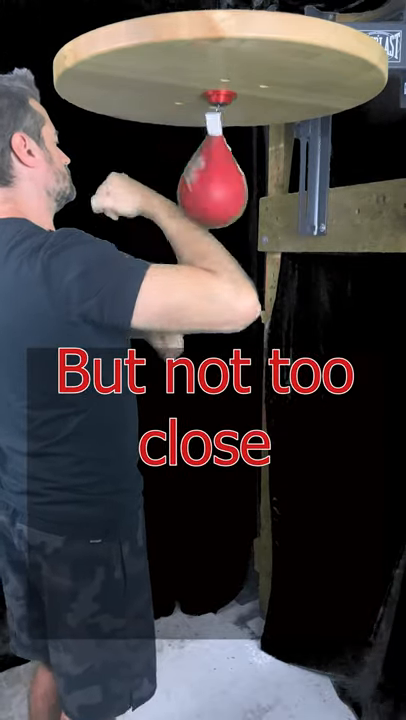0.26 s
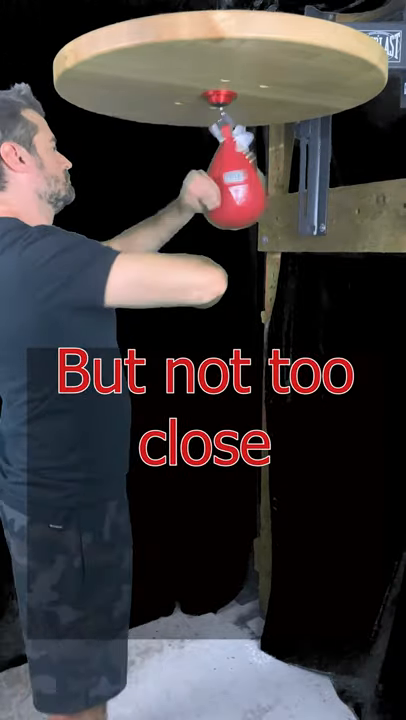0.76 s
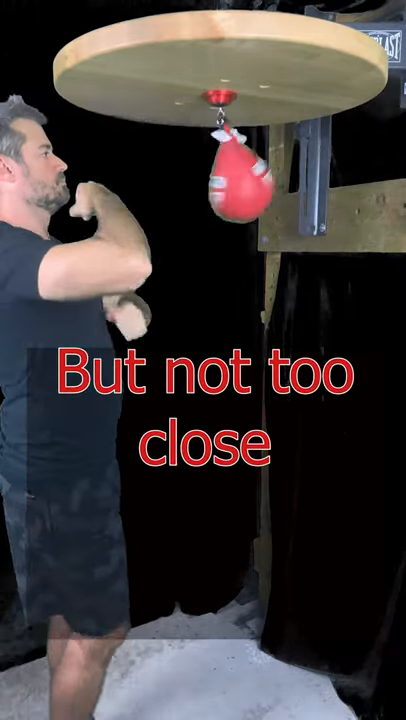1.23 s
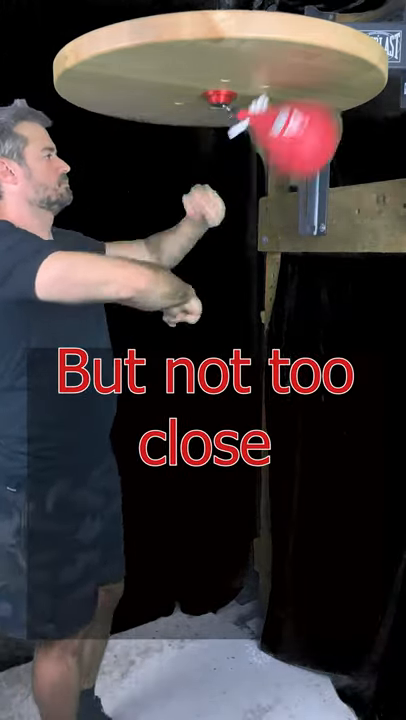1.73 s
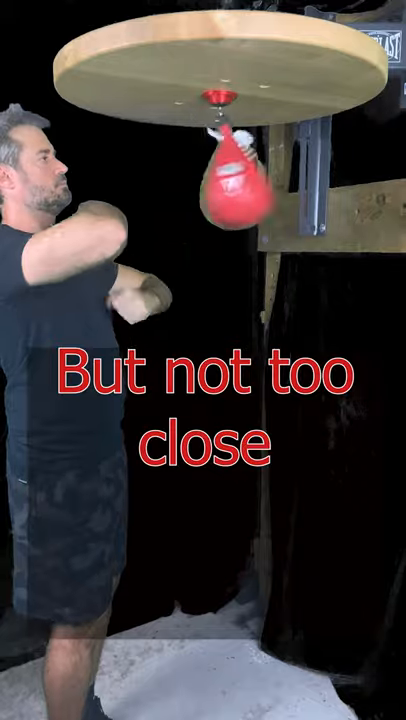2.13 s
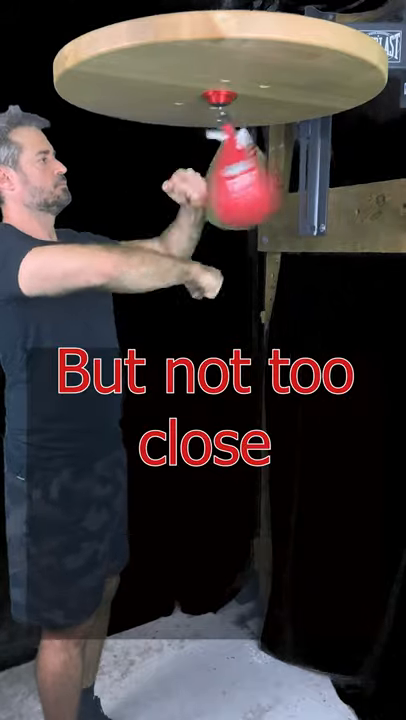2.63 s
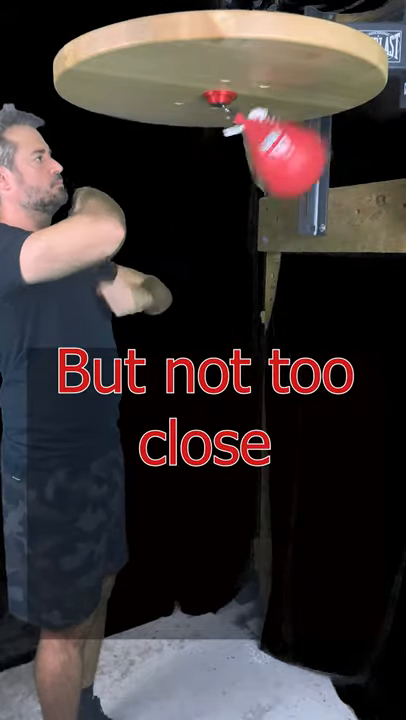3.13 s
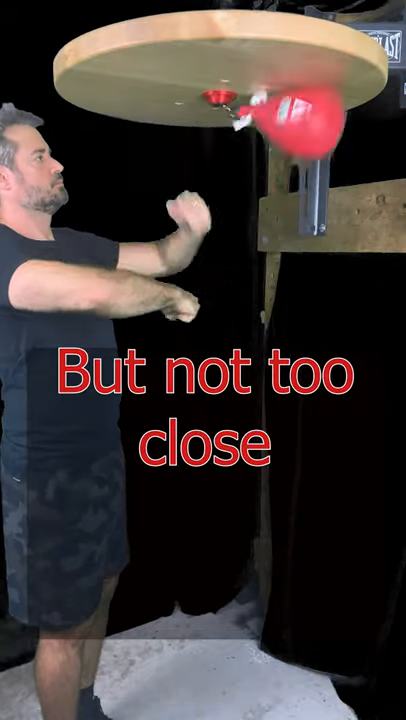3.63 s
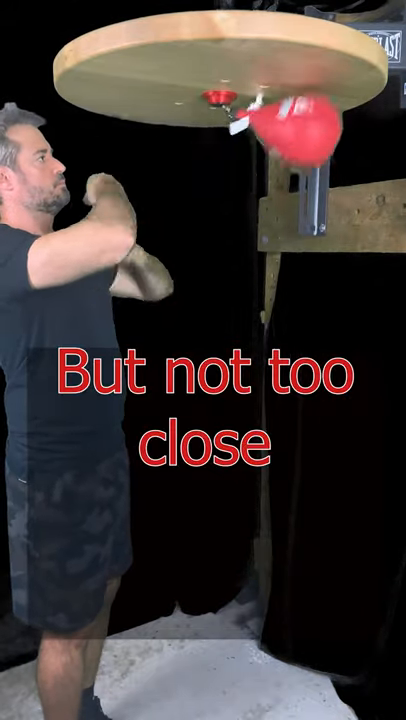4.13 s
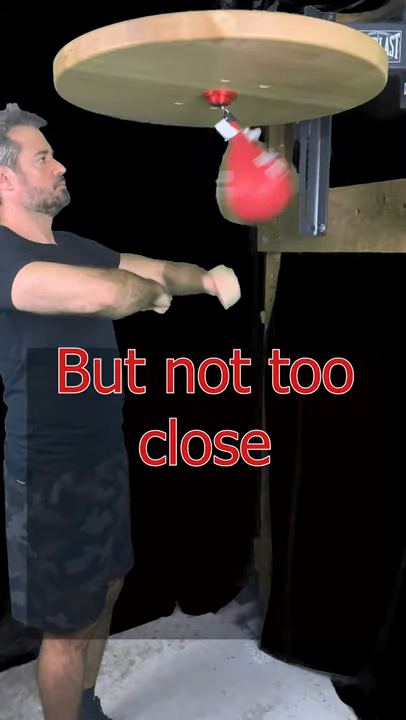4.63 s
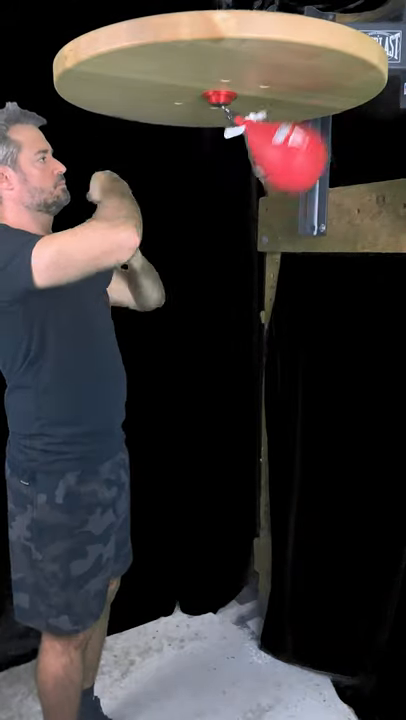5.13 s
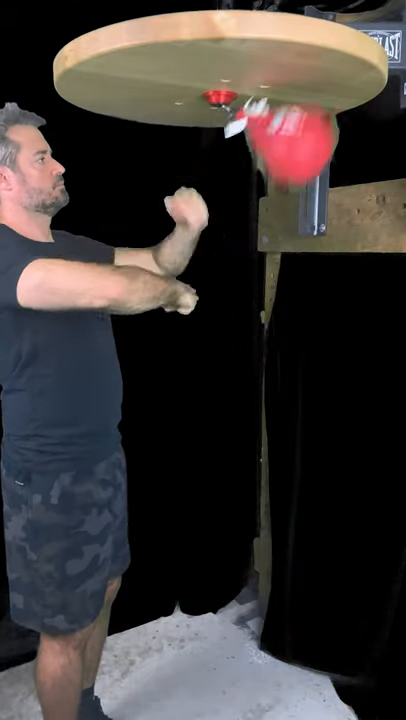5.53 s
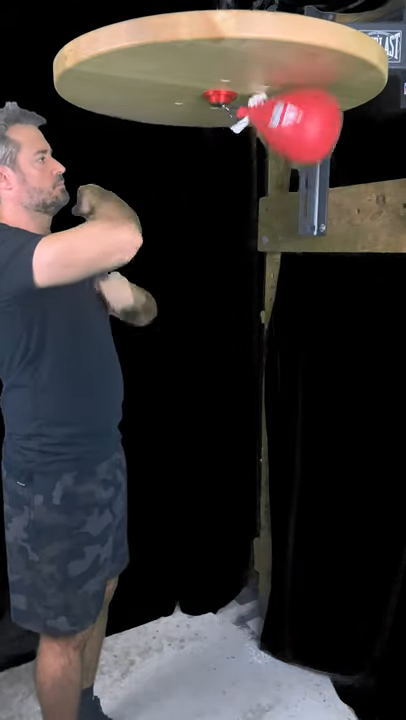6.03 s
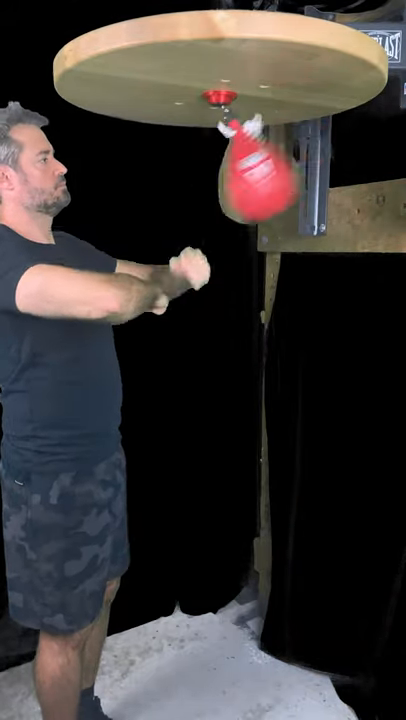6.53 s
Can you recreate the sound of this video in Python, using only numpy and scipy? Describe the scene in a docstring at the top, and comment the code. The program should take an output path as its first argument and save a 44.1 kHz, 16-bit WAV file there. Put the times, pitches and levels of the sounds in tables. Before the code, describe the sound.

A leather speed bag is punched in a small hard room, rattling off a wooden board in quick uneven slaps, knocks and low booms.

```python
"""A leather speed bag under a wooden board in a small hard room. It opens on a bag already swinging from a punch.
Then, over and over, two quick punches each throw it at the far edge; it swings free to the near edge and back.
Each contact slaps (spike, crackle), pops and knocks (decaying sines) and booms at the same moment through board,
wall and room (low decaying sines). A noise tail decays over the next second; a steady noise floor lies beneath.
It ends in mid-swing."""
import sys
import numpy as np
from scipy import signal
from scipy.fft import rfft, irfft, next_fast_len
from scipy.io import wavfile
from scipy.ndimage import uniform_filter1d

SR = 44100
rng = np.random.default_rng(int(sys.argv[2]) if len(sys.argv) > 2 else 0)


def master_out(mix):
    """Clip the mix to full scale and print it as 16-bit PCM to the path in sys.argv[1]."""
    frames = np.transpose(np.atleast_2d(mix))
    ceiling = np.clip(frames, -1, 1)
    pcm = np.round(ceiling * 32767).astype(np.int16)
    wavfile.write(sys.argv[1], SR, pcm)


N = 298998
LEAD_S = .15  # room for blows that fall before time zero
SLAP_LAG_S = .001  # the leather flattens briefly before it slaps


def undb(db):
    """Decibels to amplitude."""
    return 10 ** (np.asarray(db) / 20)


def band(x, lo_hz, hi_hz):
    """Keep one frequency band."""
    return signal.sosfilt(signal.butter(3, [lo_hz, min(hi_hz, .45 * SR)], "band", fs=SR, output="sos"), x)


def soften(x, order, hz, kind="low"):
    """Gently sloped low or high pass."""
    return signal.sosfilt(signal.butter(order, hz, kind, fs=SR, output="sos"), x)


def unit(x):
    """Scale to an RMS of one."""
    return x / np.sqrt(np.mean(x ** 2))


def add(out, sound, s):
    """Mix a sound in at time s; the buffer starts LEAD_S early."""
    i = int(round((s + LEAD_S) * SR))
    out[..., i:i + sound.shape[-1]] += sound[..., :out.shape[-1] - i]


def ring(hz, t60, gain, seconds):
    """Sum of decaying sines started by one push."""
    t = np.arange(int(seconds * SR)) / SR
    decay = np.exp(-np.log(1000) * np.outer(1 / t60, t))
    return gain @ (np.sin(2 * np.pi * np.outer(hz, t)) * decay)


def flicker(size, rate):
    """Random levels held 1 / rate seconds and slewed; spread near 1."""
    hold = int(SR / rate)
    steps = np.repeat(rng.standard_normal(size // hold + 1), hold)
    return 1.07 * uniform_filter1d(steps, hold)[:size]


# bag meets board: (time [s], snap [dB], knock [dB], weight [dB], pop [Hz]), levels relative
BOARD_HITS = [(-.038, -11.5, -20.5, -25.5, 1670), (0.1717, -18.5, -25, -33, 1550),
              (0.4482, -30.5, -30, -34, 1370), (0.6984, -13, -16, -23.5, 1500),
              (0.855, -11, -15, -24.5, 1390), (1.063, -25.5, -24, -34, 1590),
              (1.3471, -30.5, -30.5, -34, 1580), (1.5656, -15.5, -21.5, -25.5, 1570),
              (1.7679, -14, -19.5, -26, 1580), (1.991, -20, -25, -35.5, 1420),
              (2.2781, -32, -28, -35.5, 1640), (2.5363, -16, -20.5, -26.5, 1340),
              (2.7209, -13, -19.5, -23.5, 1830), (2.9306, -18, -24, -33, 1710),
              (3.2071, -24.5, -29, -34.5, 1500), (3.456, -14, -22, -27, 1390),
              (3.6538, -13, -17.5, -24, 1680), (3.8596, -18.5, -22.5, -31, 2140),
              (4.1342, -29, -31, -34.5, 1420), (4.3896, -18.5, -24, -29, 1500),
              (4.577, -15.5, -20, -25.5, 2100), (4.7984, -19.5, -24.5, -34, 1550),
              (5.0903, -30, -32.5, -35.5, 1420), (5.3645, -18, -23, -27, 1440),
              (5.5764, -14, -21, -25, 1390), (5.7879, -19.5, -22.5, -34, 1850),
              (6.0657, -26, -28.5, -36, 1570), (6.3027, -14, -20.5, -26, 1210),
              (6.4915, -14, -19, -22, 1690), (6.6817, -15.5, -20.5, -30, 2040)]
# fist meets bag: (time [s], snap [dB], knock [dB], weight [dB], pop [Hz]), levels relative
FIST_HITS = [(-0.15, -23, -15, -18.5, 1800), (0.614, -27, -32, -26.5, 1390), (0.7849, -27, -30, -23, 1600),
             (1.484, -32.5, -40.5, -29.5, 1610), (1.679, -33, -33, -25, 1190),
             (2.4464, -37, -35.5, -29, 1700), (2.6396, -29.5, -31.5, -25, 1610),
             (3.3655, -35.5, -36.5, -28.5, 1620), (3.57, -31, -31, -24.5, 1600),
             (4.2906, -31, -33, -28, 1820), (4.5008, -29.5, -30.5, -24.5, 1140),
             (5.264, -35.5, -36.5, -30, 1170), (5.4883, -26.5, -27, -26, 1280),
             (6.2201, -38, -37, -27.5, 1630), (6.4114, -25.5, -27.5, -23, 1930)]
# slap grows with snap, thud with weight, by striking place:
# (slap offset [dB], slap slope [dB per dB], thud offset [dB], thud slope [dB per dB])
LEVEL_LAWS = {"near": (9.5, 1.12, -7.5, 0.81), "fist": (7.5, 0.69, 2.3, 1.564), "far": (4, 0.8, -12.5, 0.9)}


def blows():
    """All contacts in order, with layer levels; a punch sends the bag to the far edge, a free swing changes edge."""
    rows = sorted([(*r, "fist") for r in FIST_HITS] + [(*r, "board") for r in BOARD_HITS])
    out, place = [], "fist"
    for s, snap_db, knock_db, weight_db, pop_hz, kind in rows:
        if kind == "fist":
            place = "fist"
        else:
            place = "near" if place == "far" else "far"
        slap_offset, slap_slope, thud_offset, thud_slope = LEVEL_LAWS[place]
        slap_db = slap_offset + slap_slope * snap_db
        thud_db = thud_offset + thud_slope * weight_db
        out.append((s, slap_db, knock_db, weight_db, pop_hz, thud_db, snap_db, place))
    return out


# early echoes off board, wall and arms: (delay [s], level against the spike [dB])
NEAR_ECHOES = [(.00035, -1.5), (.0022, -16), (.0032, -11), (.0065, -15.5), (.0095, -16), (0.011, -15)]


def slap(size, lo_hz=2000, hi_hz=13500, rattle_db=-26, rattle_s=0.003, touch_db=-22, touch_s=0.0007,
         spike_db=5, fist_spike_db=-12, tick_db=-2, knuckle_s=0.0084, knuckle_db=-5, gain_db=8):
    """Leather meeting flat: a rising touch, a steep spike with near echoes, a short crackle; a fist lands twice."""
    t, out = np.arange(900) / SR - SLAP_LAG_S, np.zeros(size)
    touch = undb(touch_db) * np.exp(np.minimum(t, 0) / touch_s)
    rattle = undb(rattle_db) * np.exp(-np.maximum(t, 0) / rattle_s)
    shape = np.where(t < 0, touch, rattle)
    delay, echo_db = np.transpose(NEAR_ECHOES)
    for s, slap_db, *_, place in blows():
        level_db = slap_db + gain_db
        crackle = shape * rng.standard_normal((2, len(t)))
        spike = undb(fist_spike_db if place == "fist" else spike_db)
        crackle[:, np.argmax(t >= 0)] = spike
        moved = delay * (1 + 0.14 * rng.standard_normal(len(delay)))  # the bag never lands twice on one spot
        echo = spike * undb(echo_db) * rng.uniform(-1.12, 1, len(delay))
        crackle[0, np.searchsorted(t, np.clip(moved, 0, .018))] += echo
        add(out, undb(level_db) * crackle[0], s)
        if place == "fist":
            # skin on leather: a thin bright tick, then a second landing
            add(out, undb(level_db + tick_db) * np.array([.5, -1, .5]), s + SLAP_LAG_S)
            add(out, undb(level_db + knuckle_db) * crackle[1], s + knuckle_s)
    return soften(soften(out, 2, lo_hz, "high"), 2, hi_hz)


# short rings of wood and leather: (frequency [Hz], decay t60 [s], relative level [dB])
WOOD_MODES = [(370, 0.18, -3.5), (656, 0.054, -11.5), (1250, 0.014, -26.5), (1620, 0.017, 0.5),
              (1944, 0.03, -3.5), (2418, 0.038, -8), (3100, 0.011, -6.5)]


def knock(size, scatter_db=-2.5, detune=0.044, gain_db=-6, pop_db=12, pop_t60=0.0068, focus_oct=0.84,
          wall_s=0.011, wall_db=-10.5):
    """The air in the bag pops at its own pitch; wood modes near that pitch ring on, in a new mix each time."""
    hz, t60, mode_db = np.transpose(WOOD_MODES)
    out = np.zeros((2, size))
    for s, _, knock_db, _, pop_hz, *_ in blows():
        level_db, start = knock_db + gain_db, s + SLAP_LAG_S
        pitch = hz * (1 + detune * rng.standard_normal(len(hz)))
        focus = np.exp(-.5 * (np.log2(hz / pop_hz) / focus_oct) ** 2) + 0.25
        mix = focus * undb(mode_db + scatter_db * rng.standard_normal((2, len(hz))))
        pop = ring(np.array([pop_hz]), np.array([pop_t60]), undb([pop_db]), .05)
        add(out, undb(level_db) * (ring(pitch, t60, mix, .05) + pop), start)
        add(out, undb(level_db + wall_db) * pop, start + wall_s)  # the wall returns the pop
    return out


# low modes of board, wall and room, with the signed share each striking place gives them:
# (frequency [Hz], decay t60 [s], near edge [gain], fist [gain], far edge [gain])
LOW_MODES = [(53.5, 0.35, -0.51, -0.76, -0.54), (60.6, 0.16, 0.9, 1.8, 0.88),
             (74, 0.93, -0.24, -0.083, 0.25), (80.34, 0.6, 0.49, -0.36, -0.97),
             (82.65, 0.31, -1.17, -0.92, 0.13), (95.65, 0.37, -0.52, -0.79, -0.74),
             (100, 0.16, 1, 2.02, 0.58), (116.4, 0.12, 0.45, -0.27, 0.95),
             (126.1, 0.27, -0.36, -0.4, -0.55), (139.8, 0.57, 0.059, 0.024, 0.26),
             (152, 0.054, -0.49, -0.088, -0.73), (168.6, 0.51, -0.095, -0.26, -0.21),
             (186.2, 0.6, 0.099, 0.062, -0.024), (203.9, 0.68, 0.078, 0.055, 0.17),
             (242, 0.13, 0.0083, -0.03, -0.23), (255, 0.15, 0.024, -0.024, 0.014),
             (320, 0.078, -0.018, -0.0083, -0.13)]
# onset of the boom against the blow, by striking place: (lag [s]), negative is early
LOW_LAG_S = {"near": -.0007, "fist": 0, "far": -.0005}
# boom level added to the weight, by striking place: (level [dB])
LOW_GAIN_DB = {"near": 9, "fist": 2.5, "far": 4}


def boom(size):
    """Every blow at one place rings the low modes of board, wall and room in the same proportions."""
    hz, t60, *share = np.transpose(LOW_MODES)
    shape = {place: ring(hz, t60, gain, 0.88) for place, gain in zip(("near", "fist", "far"), share)}
    out = np.zeros(size)
    for s, _, _, weight_db, *_, place in blows():
        level = undb(weight_db + LOW_GAIN_DB[place])
        add(out, level * shape[place], s + LOW_LAG_S[place])
    return out


# squashed bag: (frequency [Hz], decay t60 [s], relative level [dB])
BAG_MODES = [(320, 0.048, 2), (370, 0.022, -7), (557, 0.059, -4)]


def thud(size, gain_db=-3, detune=0.02):
    """The whole bag squashes and springs back: short low rings, slightly detuned each time."""
    hz, t60, mode_db = np.transpose(BAG_MODES)
    out = np.zeros(size)
    for s, *_, thud_db, _, _ in blows():
        pitch = hz * (1 + detune * rng.standard_normal(len(hz)))
        add(out, ring(pitch, t60, undb(thud_db + gain_db + mode_db), .05), s + SLAP_LAG_S)
    return out


def swivel(size, early_s=0.013, gain_db=-17, lo_hz=750, hi_hz=2600, grain_db=4):
    """The swivel rattles as the bag swings up to the board: lumpy noise just ahead of contact."""
    out, span = np.zeros((2, size)), int(early_s * SR)
    for s, _, knock_db, *_, place in blows():
        if place != "fist":
            lumps_db = grain_db * np.repeat(rng.standard_normal(span), 60)[:span]
            grains = rng.standard_normal((2, span)) * undb(lumps_db)
            add(out, undb(knock_db + gain_db) * grains, s - early_s)
    return band(out, lo_hz, hi_hz)


# reverberant bands: (centre [Hz], decay t60 [s], level against the blow [dB], likeness left-right [0-1])
ROOM_BANDS = [(236.5, 0.64, -15.5, 0.89), (384.7, 0.64, -16, 0.73), (619, 0.47, -18, 0.22),
              (1036, 0.46, -20, 0.17), (1500, 0.38, -17, 0.52), (2330, 0.4, -18.5, 0),
              (4010, 0.42, -20, 0.51), (4900, 0.4, -24.5, 1), (7200, 0.32, -20.5, 1),
              (10100, 0.29, -25.5, 0.3), (13100, 0.28, -27.5, .5)]
# narrow resonances of board, bracket and room that colour the tail:
# (centre [Hz], decay t60 [s], level against the blow [dB], likeness left-right [0-1])
ROOM_RINGS = [(149.2, 0.97, -15.5, 0.98), (312.5, 0.29, -26.5, 1), (493, 0.3, -30, 0.3),
              (658, 0.22, -20, 0.4), (816, 0.3, -26.5, 0.5), (1210, 0.28, -25, 0),
              (1390, 0.35, -27.5, 0.43), (1620, 0.54, -38.5, 0), (2115, 0.86, -35.5, 0),
              (2767, 0.087, -21, 0)]


def tail(size, rise_s=0.00067, fist_db=3, fist_air_db=1, thud_share=0.42, lumpy_db=2, lumps=60, colour_db=3,
         late_db=-23, late_stretch=3.17):
    """Dense reflections, band by band: low bands follow boom and thud, middle ones the knock, high ones the snap."""
    out, t = np.zeros((2, size)), np.arange(SR) / SR
    bands = [(row, 1.25) for row in ROOM_BANDS] + [(row, 1.05) for row in ROOM_RINGS]
    for (hz, t60, db, alike), span in bands:
        rate = 2 * np.log(1000) / t60  # for power
        late = undb(2 * late_db) * np.exp(-rate * t / late_stretch)  # weaker, slower: the adjoining space
        decay = (np.exp(-rate * t) + late) * (1 - np.exp(-t / rise_s))
        power = np.zeros(size)
        for s, _, knock_db, weight_db, pop_hz, thud_db, snap_db, place in blows():
            fist = place == "fist"
            low_db = thud_share * weight_db + (1 - thud_share) * thud_db + 5
            high_db = snap_db + fist_air_db * fist
            drive_db = np.interp(np.log(hz), np.log([400, 1000, 2500, 5000]),
                                 [low_db, knock_db, knock_db, high_db])
            # the room returns the pop's colour
            drive_db += colour_db * np.exp(-2 * np.log2(hz / pop_hz) ** 2)
            add(power, undb(2 * (drive_db + db + fist_db * fist)) * decay, s + SLAP_LAG_S)
        mid, side = (unit(band(rng.standard_normal(size), hz / span, hz * span)) for _ in range(2))
        power = power * undb(2 * lumpy_db * flicker(size, lumps))  # reflections arrive in clumps
        alike = np.clip(alike, 0, 1)
        common = np.sqrt(1 + alike) * mid
        opposed = np.sqrt(1 - alike) * side * np.array([[1], [-1]])
        out += np.sqrt(power / 2) * (common + opposed)
    return out


# steady noise bed: (centre [Hz], relative level in the band [dB])
NOISE_BANDS = [(60, -58.5), (150, -57), (500, -64.5), (1500, -76), (10000, -105)]


def floor(size):
    """Quiet steady room and microphone noise, summed from broad bands."""
    return sum(undb(db) * unit(band(rng.standard_normal((2, size)), hz / 1.7, hz * 1.7))
               for hz, db in NOISE_BANDS)


def scene():
    """Mix all layers and drop the lead-in."""
    lead = int(LEAD_S * SR)
    size = N + lead
    contact = slap(size) + knock(size) + boom(size) + thud(size)
    return (contact + swivel(size) + tail(size) + floor(size))[:, lead:]


# stereo balance: (frequency [Hz], left minus right [dB])
PORT_BALANCE = [(60, -1), (110, -4), (200, -4), (380, -5), (700, -3), (1290, -2.0), (2380, -1), (4400, -2),
                (8120, 0.5), (15000, -0.5)]


def record(dry, split_hz=4000, lag_s=.000192, turn_rad=4.0, rumble_cut_hz=28, ceiling=.72, top_hz=16000):
    """Two ports with their own balance; above the split the right gets the left treble, phase-turned and late."""
    size = next_fast_len(N + 4096)
    hz = np.arange(size // 2 + 1) * SR / size + 1  # 1 Hz up, to keep clear of zero
    left, right = rfft(dry, size)
    balance_hz, balance_db = np.transpose(PORT_BALANCE)
    tilt = undb(np.interp(np.log(hz), np.log(balance_hz), balance_db) / 2)
    high = 1 / (1 + (split_hz / hz) ** 10)
    shared = left * np.exp(-1j * (2 * np.pi * hz * lag_s + turn_rad))
    right = np.sqrt(1 - high) * right + np.sqrt(high) * shared
    both = irfft(np.array([left * tilt, right / tilt]), size)[:, :N]
    both = soften(both, 1, rumble_cut_hz, "high")
    both = both / (1 + (both / ceiling) ** 4) ** .25  # the loudest peaks are rounded
    return signal.sosfilt(signal.ellip(8, .2, 70, top_hz, fs=SR, output="sos"), both)


dry = scene()
out = record(dry)
master_out(out)
```